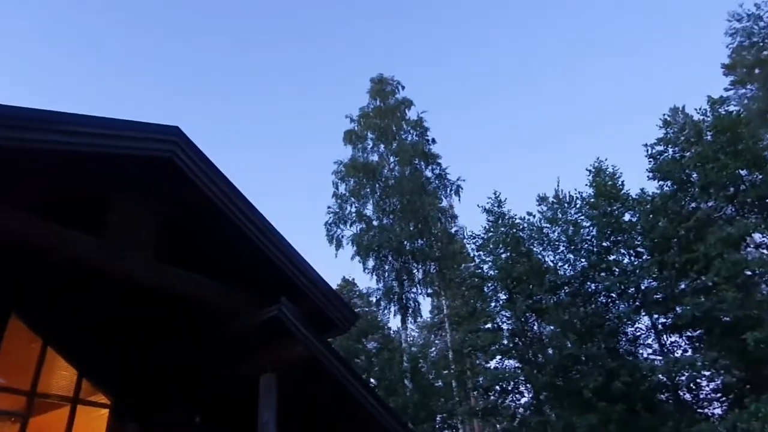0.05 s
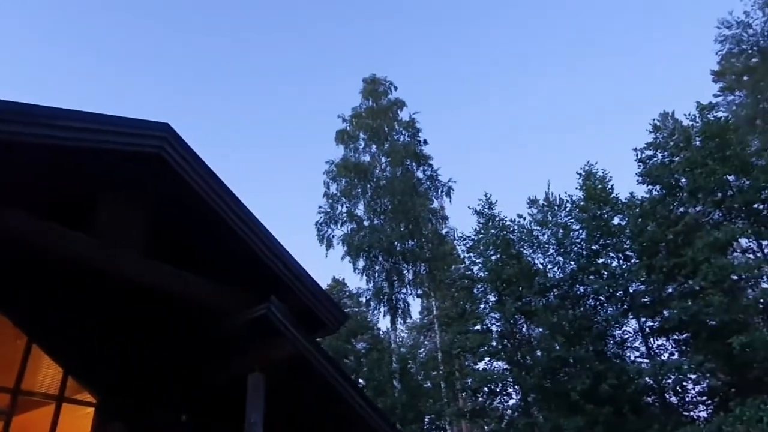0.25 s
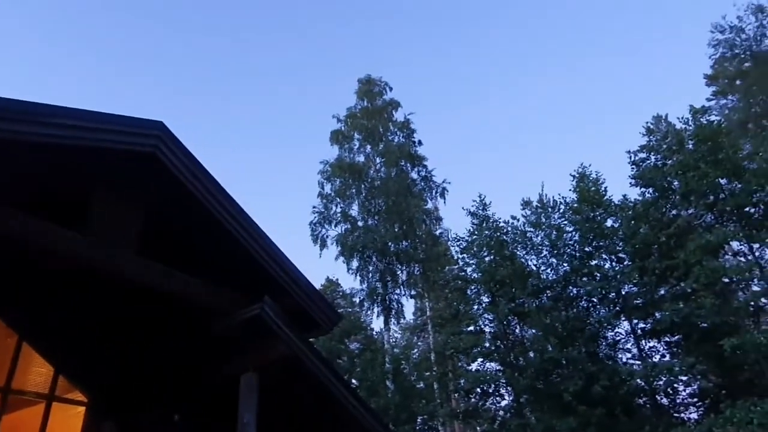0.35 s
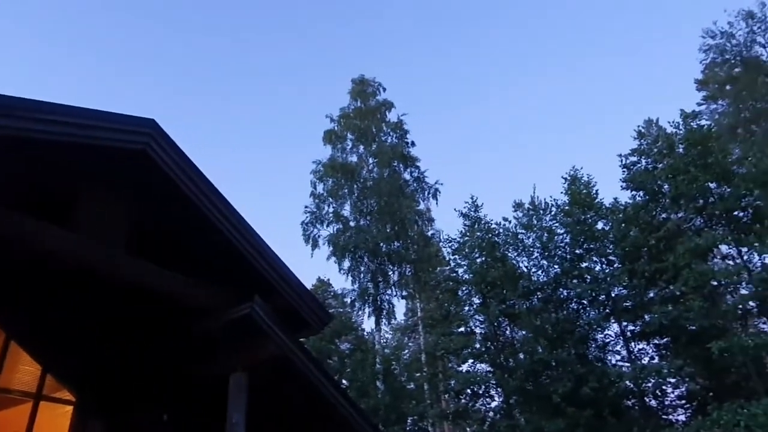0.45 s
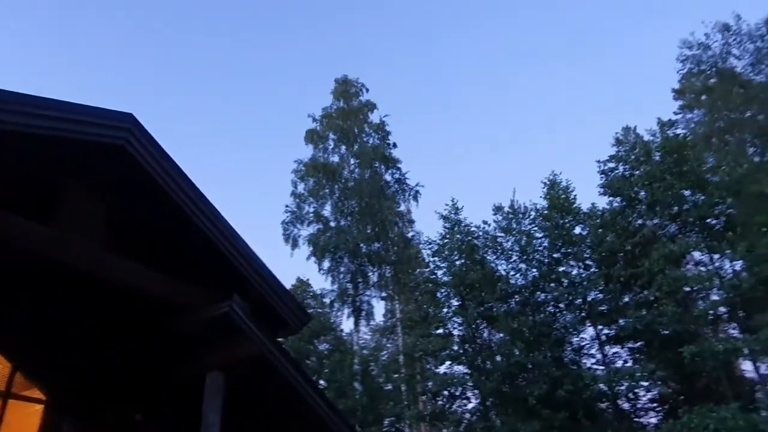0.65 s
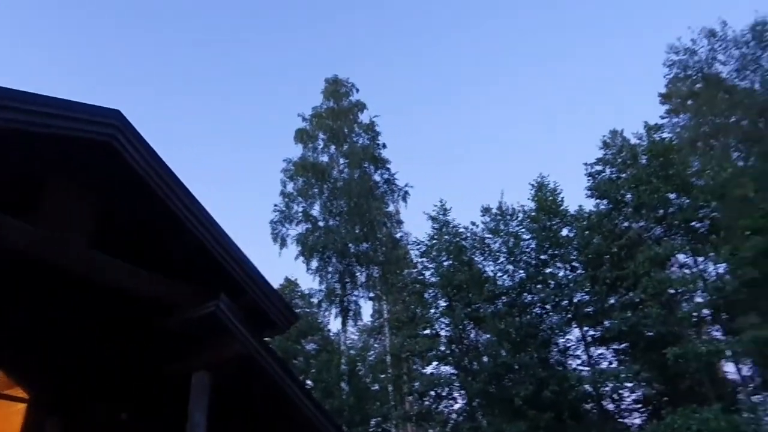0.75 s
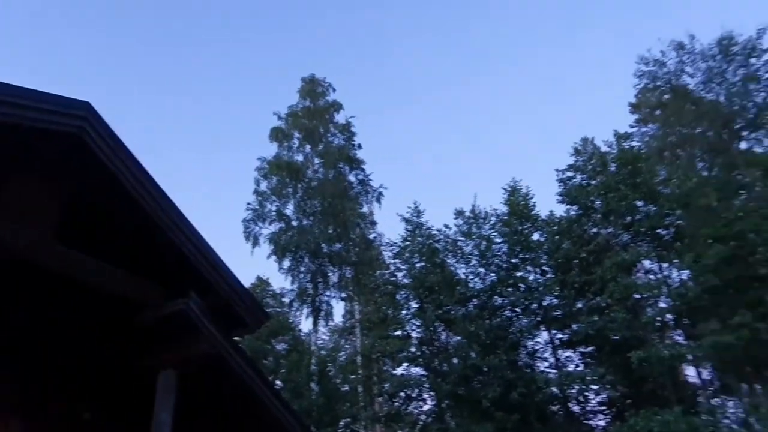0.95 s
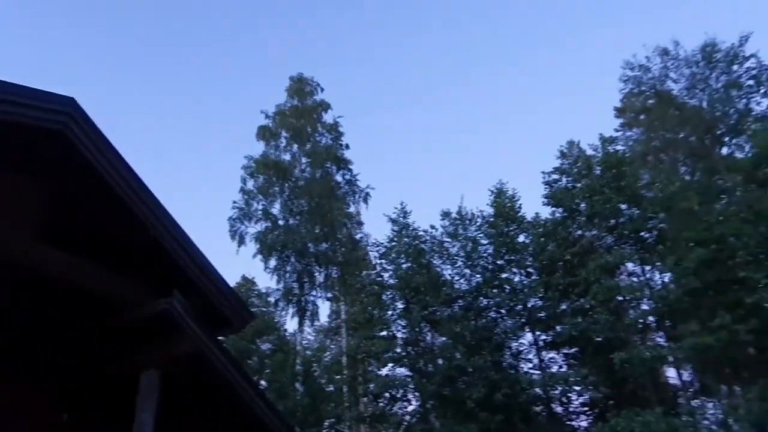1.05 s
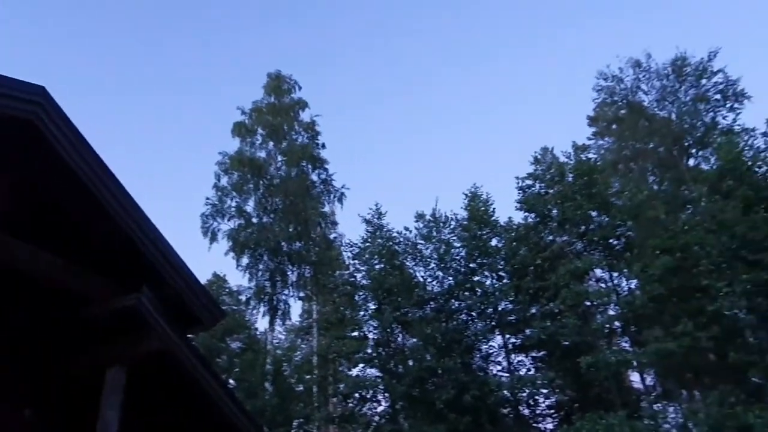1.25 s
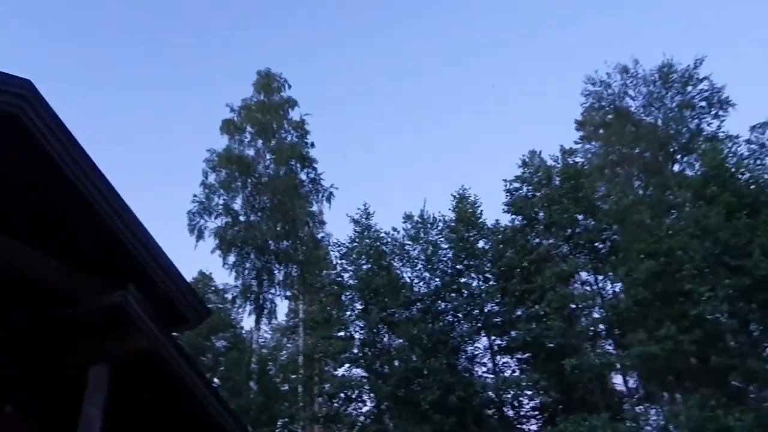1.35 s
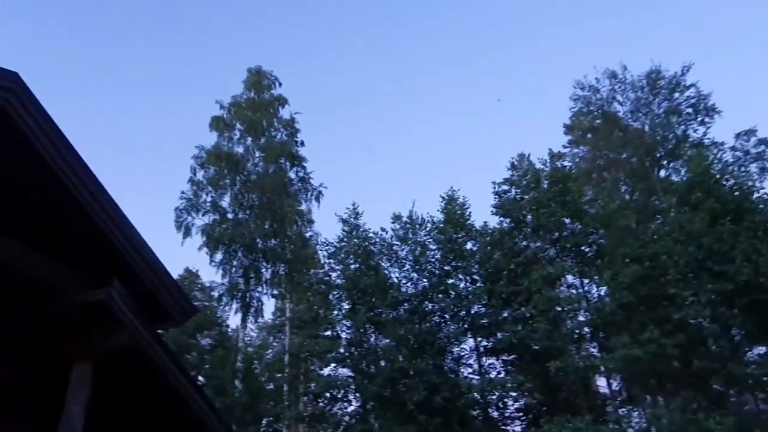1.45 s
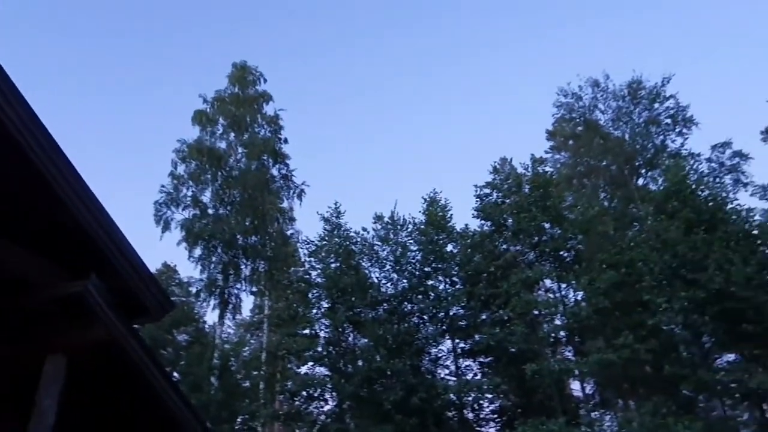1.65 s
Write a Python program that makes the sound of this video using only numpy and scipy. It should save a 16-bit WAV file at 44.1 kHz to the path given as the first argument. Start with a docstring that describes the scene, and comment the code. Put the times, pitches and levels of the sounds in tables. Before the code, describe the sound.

A large fly buzzes close on the left, its pitch wavering. The buzz rises at about 0.2 seconds, is bright from 0.35 to 0.5, dips, then swells again, loudest from 0.8 to 1.0, with a slight rumble of wing air on the microphone. From 1.1 seconds only a thin hum remains. Soft handling bumps come near 1.2 and 1.5 seconds, over faint steady outdoor hiss.

```python
"""Fly at the microphone

An insect, probably a large fly, darts about beside the left microphone on a still evening. Its
wingbeat wavers as it steers. On two close passes the buzz swells and brightens and the wings fan air
onto the microphone; then it sinks to a thin hum. Faint hiss and soft handling bumps lie beneath."""
import sys
import numpy as np
from scipy import signal
from scipy.fft import rfft, irfft
from scipy.io import wavfile

SR = 44100
rng = np.random.default_rng(int(sys.argv[2]) if len(sys.argv) > 2 else 0)


def dump(signal):
    """Clip the signal to [-1, 1] and save it as 16-bit WAV at the path in sys.argv[1]."""
    limited = np.clip(np.atleast_2d(signal).T, -1, 1)
    pcm = np.round(limited * 32767).astype(np.int16)
    wavfile.write(sys.argv[1], SR, pcm)


N = 74970
T = np.arange(N) / SR

# The pitch of the buzz. Each row: time in seconds, wingbeat in Hz.
WINGBEAT = [(0.0, 266.5), (0.08, 276), (0.136, 261.5), (0.2, 281.7), (0.223, 281.3), (0.263, 264.8),
            (0.303, 270.6), (0.367, 272.3), (0.383, 255.4), (0.431, 284.6), (0.447, 278.5), (0.479, 287.9),
            (0.535, 264.6), (0.551, 284.7), (0.583, 260.2), (0.615, 283), (0.647, 249.8), (0.67, 253),
            (0.686, 272.2), (0.71, 280.2), (0.726, 268.8), (0.75, 275.2), (0.774, 254), (0.822, 271),
            (0.854, 274.4), (0.878, 258.1), (0.91, 276.3), (0.942, 271.1), (0.958, 295.6), (0.982, 284.7),
            (0.998, 271), (1.022, 259.2), (1.046, 272.6), (1.07, 270.9), (1.101, 242.5), (1.157, 241.2),
            (1.197, 276.7), (1.237, 289.1), (1.293, 250.4), (1.325, 280.3), (1.357, 285.6), (1.405, 254.3),
            (1.445, 272.1), (1.453, 262.6), (1.477, 287.2), (1.501, 281.9), (1.525, 254.6), (1.564, 253),
            (1.62, 269.6), (1.698, 261)]
# Fader rides for harmonics one, two and three. Each row: time in seconds, level in dB before trim.
FUNDAMENTAL_RIDE = [(0.0, -90), (0.094, -88), (0.202, -43.5), (0.226, -37.5), (0.274, -42), (0.358, -31),
                    (0.388, -39.5), (0.416, -33), (0.472, -31), (0.562, -55.5), (0.62, -47), (0.652, -54.5),
                    (0.738, -41.5), (0.78, -46), (0.846, -31.5), (0.994, -30.5), (1.108, -72), (1.14, -76),
                    (1.22, -60.5), (1.438, -88.5), (1.504, -86), (1.7, -86.5)]
OCTAVE_RIDE = [(0.0, -77), (0.104, -64.5), (0.132, -69.5), (0.178, -57.5), (0.226, -59), (0.344, -47),
               (0.368, -55.5), (0.426, -54.5), (0.468, -45), (0.558, -50), (0.582, -57), (0.652, -54.5),
               (0.69, -44), (0.742, -40), (0.786, -54.5), (0.828, -40.5), (0.852, -42), (0.884, -63),
               (0.96, -37), (1.05, -58), (1.102, -77.5), (1.16, -87), (1.254, -62.5), (1.292, -71),
               (1.358, -63.5), (1.392, -72), (1.684, -70), (1.7, -79)]
THIRD_RIDE = [(0.0, -99), (0.122, -85.5), (0.216, -49.5), (0.288, -50), (0.35, -42), (0.382, -47),
              (0.478, -39), (0.534, -54.5), (0.572, -56.5), (0.666, -58), (0.7, -49), (0.77, -52),
              (0.842, -40), (1.002, -42.5), (1.108, -78), (1.212, -69.5), (1.296, -89), (1.344, -75),
              (1.458, -87), (1.496, -78), (1.61, -94), (1.7, -93)]
# The bite of the buzz. Each row: time in seconds, then low, mid, high and treble levels in dB before trim.
BUZZ_RIDES = [(0.0, -98, -99, -95, -101), (0.108, -90, -96.5, -101, -98), (0.184, -76, -102.5, -89, -95),
              (0.216, -55.5, -76, -76, -91.5), (0.24, -56.5, -66, -70.5, -83),
              (0.26, -59, -68, -77.5, -80.5), (0.322, -53.5, -60.5, -73.5, -82),
              (0.354, -45.5, -53.5, -61.5, -66), (0.368, -49, -53, -59, -65.5),
              (0.382, -54, -61.5, -76.5, -70.5), (0.426, -45, -57.5, -56.5, -63),
              (0.448, -49.5, -54, -68, -65), (0.464, -43.5, -53, -58.5, -67.5),
              (0.492, -51, -52.5, -65, -64.5), (0.524, -62.5, -59.5, -88.5, -78),
              (0.562, -63.5, -66.5, -77.5, -80), (0.6, -67, -64, -101, -85.5),
              (0.666, -64.5, -67, -86, -92), (0.69, -58, -58.5, -76.5, -81), (0.71, -53, -65, -73, -85),
              (0.724, -53, -51.5, -68, -75), (0.742, -51, -55, -58, -71), (0.776, -59, -61, -77, -83.5),
              (0.818, -57.5, -56, -81, -80.5), (0.838, -48.5, -50, -62, -69),
              (0.852, -45, -47.5, -60, -62.5), (0.898, -44.5, -53, -55.5, -64),
              (0.936, -45.5, -53, -60.5, -67), (0.96, -40.5, -58.5, -43.5, -65.5),
              (0.984, -43, -60.5, -51.5, -68.5), (1.046, -69, -62.5, -96.5, -81),
              (1.108, -89.5, -95, -106, -97), (1.164, -92, -105, -109, -94), (1.234, -76, -103, -101, -101),
              (1.438, -92.5, -99, -105, -101), (1.7, -90, -97, -97, -99)]
# The four bands of those rides. Each row: lower edge in Hz, upper edge in Hz.
BUZZ_BANDS = [(950, 1500), (1500, 2330), (2330, 3150), (3250, 7500)]
# Where each ride acts fully. Each entry: band centre in Hz.
BAND_CENTRES = [1270, 1936, 2710, 3300]
# The tone of the wing snap. Each row: frequency in Hz, relative overtone level in dB.
SNAP_COLOUR = [(1080, 1), (1360, -4), (1630, -13), (1900, -19), (2200, -17), (2750, -21.5), (3100, -30),
               (3600, -29), (4500, -35), (6000, -41.5), (7200, -52), (8000, -59)]
# Air torn by each stroke. Each row: frequency in Hz, relative noise density in dB.
SWISH_COLOUR = [(300, -5.5), (700, -9.5), (1500, -7.5), (2600, 0.5), (3300, -2.5), (5000, -4),
                (7000, -10.5), (8000, -22), (14000, -29.5)]
# Wing draught on the microphone. Each row: time in seconds, level in dB before trim.
DRAUGHT_RIDE = [(0.1, -102), (0.192, -75), (0.226, -70.5), (0.26, -76), (0.32, -73.5), (0.336, -59.5),
                (0.35, -53.5), (0.444, -73.5), (0.486, -68.5), (0.57, -70.5), (0.584, -83), (0.678, -83),
                (0.74, -60), (0.764, -61.5), (0.798, -81), (0.838, -60.5), (0.918, -74), (0.938, -72),
                (0.962, -58), (1.008, -62), (1.042, -77), (1.092, -77.5), (1.162, -93), (1.182, -85),
                (1.3, -90)]
# The draught's low rumble. Each row: frequency in Hz, relative noise density in dB.
DRAUGHT_COLOUR = [(20, -29.5), (35, -7.5), (55, -1), (85, 0), (140, -12.5), (220, -6.5), (400, -22.5),
                  (900, -36), (3000, -88)]
# Handling bumps. Each row: start in seconds, level in dB before the envelope.
BUMPS = [(1.182, -65), (1.52, -53), (1.556, -64.5)]
# Their dull thud. Each row: frequency in Hz, relative noise density in dB.
BUMP_COLOUR = [(20, -26), (70, 15), (160, 5.5), (300, -14), (500, -14), (2000, -64)]
# Evening air and microphone hiss. Each row: frequency in Hz, relative noise density in dB.
HISS_COLOUR = [(20, -8.5), (35, 7), (60, 18.5), (130, 7), (300, 9.5), (700, 7.5), (1200, 0), (3000, -2),
               (6000, -9), (9000, -10), (12000, -6.5), (14500, -10.5)]

FUNDAMENTAL_TRIM_DB, OCTAVE_TRIM_DB, THIRD_TRIM_DB = 6.5, 6.5, 5.5
BUZZ_TRIMS_DB = [4.9, 7.2, 3.1, 1.9]
FLUTTER_DEPTH, FLUTTER_HZ = 0.0054, 75.6  # unevenness of the wingbeat
JITTER_S, JITTER_HZ = 0.8e-5, 237.6  # stroke-to-stroke timing
TURN_DB, TURN_DB_PER_KHZ, TURN_RAD, TURN_HZ = 2, 0.5, 0.64, 26.6  # overtones shift as the body turns
GRAIN_RAD_PER_KHZ, GRAIN_HZ = 0.35, 56  # high overtones flicker out of step
SMEAR_S = 8e-5  # the snap is spread over the wing, so high overtones fall out of step
BUFFET_DB, BUFFET_HZ = 41.5, 122  # the stronger the draught, the more the overtones shake


def wings():
    """A swing at the wingbeat, a push on each half stroke, and a snap with a swish once a cycle."""
    beat_hz = curve(WINGBEAT)[0] * (1 + FLUTTER_DEPTH * wander(FLUTTER_HZ))
    phase = 2 * np.pi * (np.cumsum(beat_hz) / SR + beat_hz * JITTER_S * wander(JITTER_HZ))
    snap_phase = phase - 2 * np.pi * 2 / 3  # two thirds into the cycle
    swing = ride(FUNDAMENTAL_RIDE, FUNDAMENTAL_TRIM_DB) * np.cos(phase)
    octave_gain = ride(OCTAVE_RIDE, OCTAVE_TRIM_DB)
    push = octave_gain * np.sin(2 * phase + TURN_RAD * wander(TURN_HZ))
    snap = wing_snap(snap_phase, beat_hz, octave_gain)
    buffet = 1 + ride(DRAUGHT_RIDE, BUFFET_DB) * wander(BUFFET_HZ)
    return np.sqrt(2) * (swing + (push + snap) * buffet) + wing_swish(snap_phase)


def wing_snap(phase, beat_hz, octave_gain, whine_db=-22.5):
    """The wing's snap gives the buzz its edge: harmonics 3 to 29, shifting as the body turns."""
    out = -ride(THIRD_RIDE, THIRD_TRIM_DB) * np.cos(3 * phase)
    harmonics = np.arange(4, 30)
    mean_hz = harmonics * beat_hz.mean()
    power = amp(read(SNAP_COLOUR, mean_hz)) ** 2
    band_lifts_db = []
    for level_db, trim_db, (low, high) in zip(curve(BUZZ_RIDES), BUZZ_TRIMS_DB, BUZZ_BANDS):
        band_power = power[(mean_hz > low) & (mean_hz < high)].sum()
        band_lifts_db.append(level_db + trim_db - 10 * np.log10(band_power))
    for k, hz in zip(harmonics, mean_hz):
        crossfade = [np.interp(np.log(hz), np.log(BAND_CENTRES), band) for band in np.eye(4)]
        turn_db = (TURN_DB + TURN_DB_PER_KHZ * hz / 1000) * wander(TURN_HZ)
        gain = amp(read(SNAP_COLOUR, k * beat_hz) + np.dot(crossfade, band_lifts_db) + turn_db)
        if k == 6:  # a thin whine that follows the octave's level
            gain = np.hypot(gain, octave_gain * amp(whine_db))
        smear = 2 * np.pi * hz * SMEAR_S * rng.standard_normal()
        grain = GRAIN_RAD_PER_KHZ * hz / 1000 * wander(GRAIN_HZ)
        out -= gain * np.cos(k * phase + smear + grain + TURN_RAD * wander(TURN_HZ))
    return out


def wing_swish(phase, sharpness=1.4, trim_db=-1):
    """Each stroke tears the air: noise that pulses with the snap and follows the treble ride."""
    treble_db = curve(BUZZ_RIDES)[-1]
    pulses = np.exp(sharpness * np.cos(phase))
    return amp(treble_db + trim_db) * unit(noise(SWISH_COLOUR) * pulses)


def draught():
    """Air fanned by the wings rumbles on the near microphone."""
    return ride(DRAUGHT_RIDE, trim_db=8) * noise(DRAUGHT_COLOUR)


def handling_bumps(attack_s=0.0041, decay_s=0.012):
    """Soft knocks of a hand on the camera: dull noise with a quick attack and a short tail."""
    out = np.zeros(N)
    for start, level_db in BUMPS:
        age = np.maximum(T - start, 0)
        envelope = np.minimum(age / attack_s, 1) * np.exp(-age / decay_s)
        out += amp(level_db) * envelope * noise(BUMP_COLOUR)
    return out


def hiss(level_db):
    """A steady bed of still evening air and microphone hiss."""
    return amp(level_db) * noise(HISS_COLOUR)


def amp(db):
    """Decibels to gain."""
    return 10 ** (np.asarray(db) / 20)


def unit(x):
    """Scales to rms 1."""
    return x / np.sqrt(np.mean(x ** 2) + 1e-20)


def curve(rows):
    """Each value column of a time table, at every sample."""
    times, *columns = np.transpose(rows)
    return np.array([np.interp(T, times, column) for column in columns])


def ride(rows, trim_db):
    """A fader ride plus its trim, as a gain at every sample."""
    return amp(curve(rows)[0] + trim_db)


def read(colour, hz):
    """A colour's level in dB at hz."""
    frequencies, levels_db = np.transpose(colour)
    return np.interp(np.log(hz + 1), np.log(frequencies), levels_db)


def noise(colour):
    """Noise of rms 1 in the given colour."""
    eq = amp(read(colour, np.fft.rfftfreq(N, 1 / SR)))
    return unit(irfft(rfft(rng.standard_normal(N)) * eq, N))


def wander(hz):
    """Smooth random modulation of rms 1, up to about hz."""
    rolloff = np.exp(-(np.fft.rfftfreq(N, 1 / SR) / hz) ** 2)
    return unit(irfft(rfft(rng.standard_normal(N)) * rolloff, N))


def scene():
    """The insect sits hard left; hiss and bumps fill both sides."""
    left = hiss(level_db=-79) + handling_bumps()
    right = hiss(level_db=-76) + handling_bumps()
    left += wings() + draught()
    return np.array([left, right])


def record(dry, cutoff_hz=14600):
    """The recorder's band limit: a steep high cut."""
    high_cut = signal.firwin(511, cutoff_hz, window=("kaiser", 9), fs=SR)
    return signal.oaconvolve(dry, high_cut[None], "same")


dry = scene()
out = record(dry)
dump(out)
```